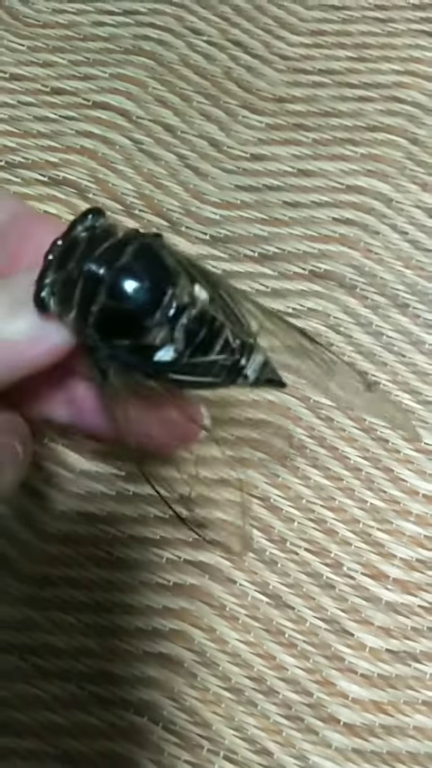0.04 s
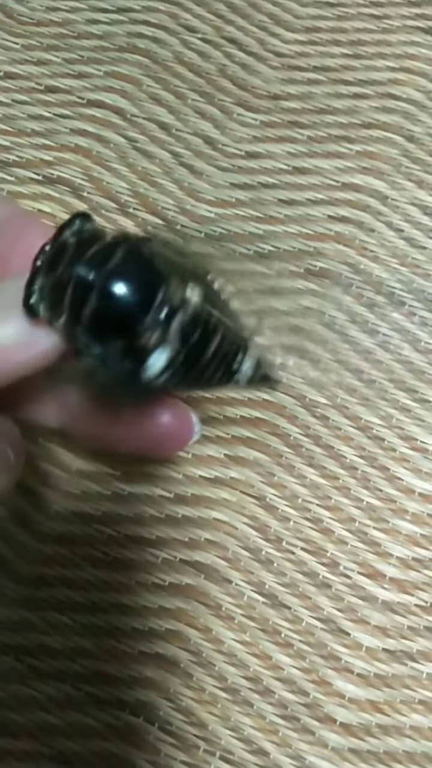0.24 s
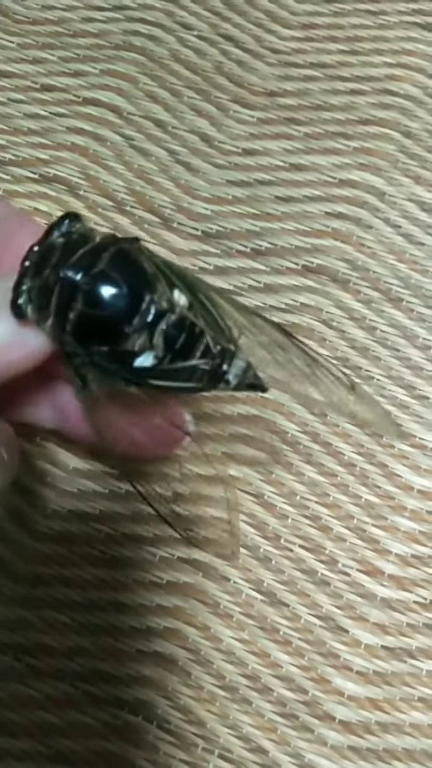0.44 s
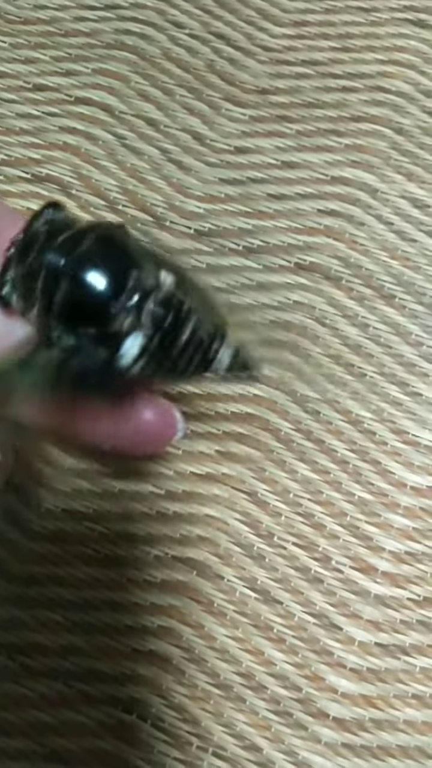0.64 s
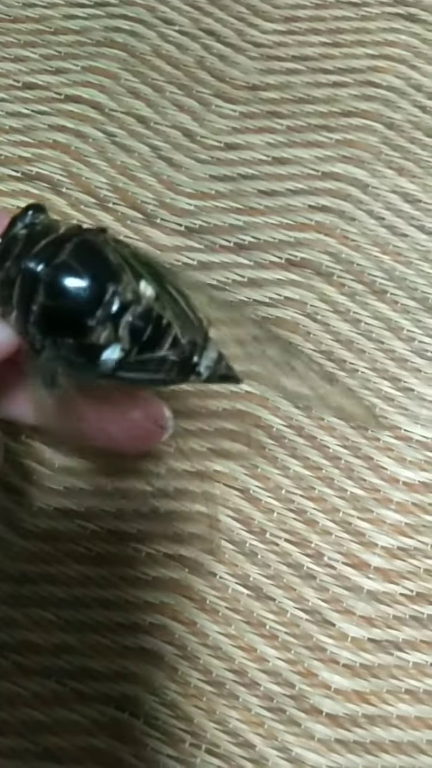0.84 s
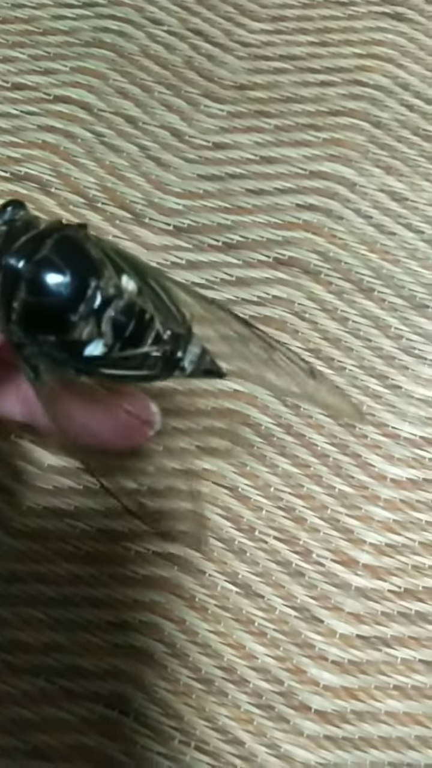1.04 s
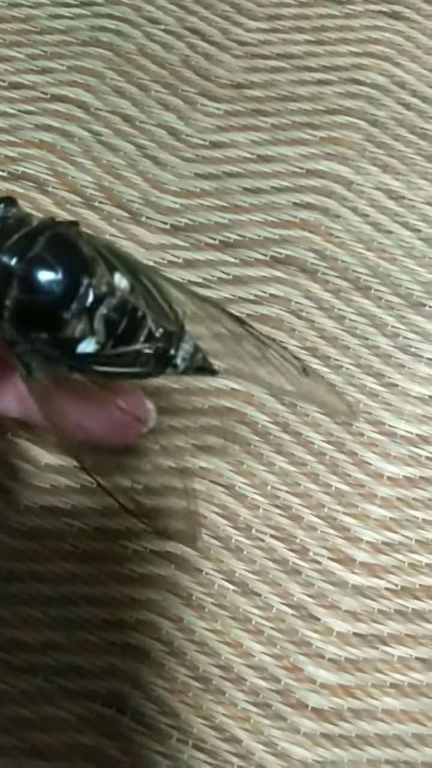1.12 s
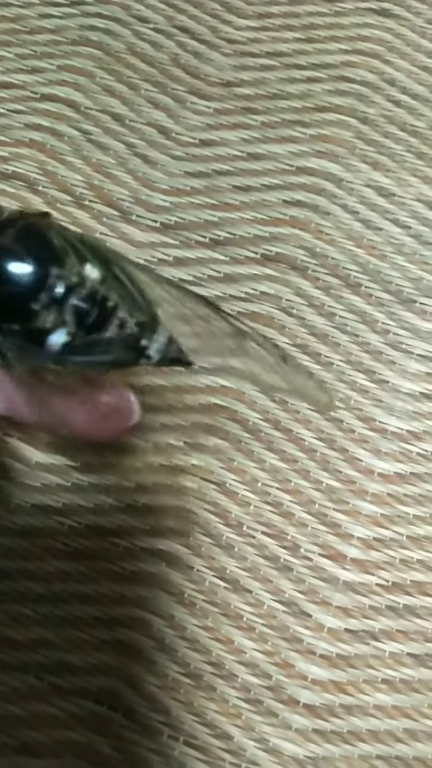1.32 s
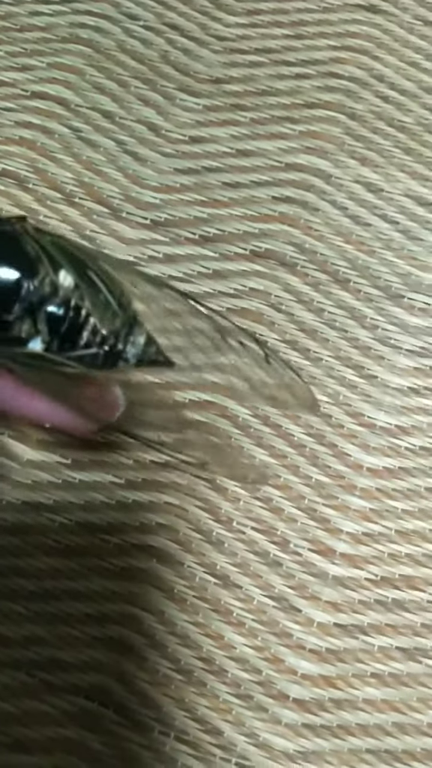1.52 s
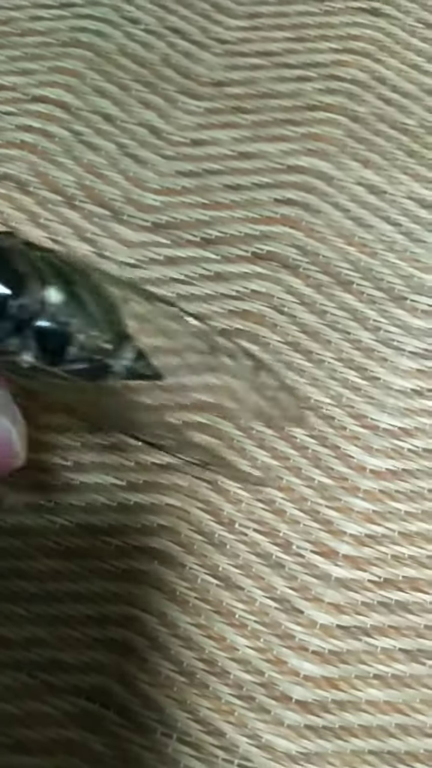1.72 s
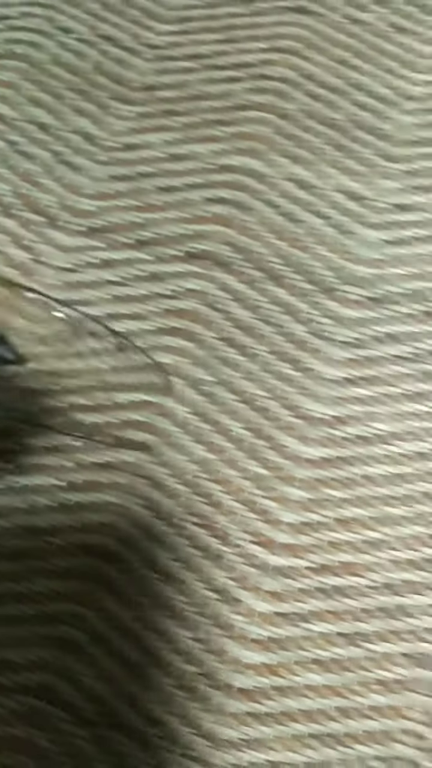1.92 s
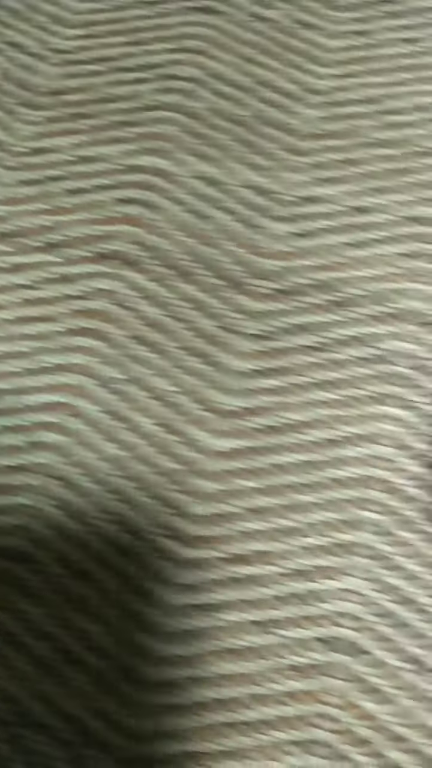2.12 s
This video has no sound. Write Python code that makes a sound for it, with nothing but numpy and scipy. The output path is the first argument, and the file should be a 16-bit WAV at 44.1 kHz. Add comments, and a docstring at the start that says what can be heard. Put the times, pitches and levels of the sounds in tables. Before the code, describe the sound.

Close up, a held cicada's stiff wings buzz and crackle in two quick bursts, then two shorter flicks, with a light flutter of air. Afterwards come only soft finger bumps and tiny ticks over faint room hiss.

```python
"""Cicada in the hand

A cicada held in the fingers beats its wings in four short bursts, close up in a quiet room.
Each beat pushes air, flicks as the wings turn, and ends in a dry snap that rings the stiff membrane.
The wings rustle as they open and fold; fingers bump softly, over rumble, hiss and a thin high band."""
import sys
import numpy as np
from scipy import signal
from scipy.fft import rfft, irfft
from scipy.io import wavfile

SR = 44100
rng = np.random.default_rng(int(sys.argv[2]) if len(sys.argv) > 2 else 0)


def inscribe(sig):
    """Save sig as 16-bit PCM at rate SR to the path in sys.argv[1].

    A 1-D sig is mono; a 2-D sig holds one channel per row.
    Samples are clipped to [-1, 1] before scaling.
    """
    pcm = np.round(np.clip(np.atleast_2d(sig).T, -1, 1) * 32767)
    wavfile.write(sys.argv[1], SR, pcm.astype(np.int16))


N = 94815

# wing beats and their accents (snap time [s], snap trim [dB], kick trim [dB], air push trim [dB])
WING_BEATS = [(-.018, -8, -11.5, 9), (.1374, -1, -13, -7), (0.1667, 1, 0.5, -0.5),
              (0.1954, 0.5, -3.5, -1.5), (0.224, 1, 0.5, 0.5), (0.2527, 1.5, 1.5, -3),
              (0.2797, 1.5, -1.5, -4), (0.3092, 0.5, -0.5, 0), (0.3379, 1.5, -1, -1),
              (0.3709, -3.5, -8.5, -3), (0.5143, -0.5, -4.5, -6), (0.5444, 0, -1.5, 0),
              (0.5734, 1, 0, -1.5), (0.6022, -0.5, -3.5, -7.5), (0.6304, 2, -2.5, 1), (0.6595, 1.5, -1, -3),
              (0.6891, -0.5, -1.5, -2.5), (0.878, -5, -3.5, -6.5), (0.9082, 1, -11, -2),
              (0.9392, -3, -3, -1), (1.1958, -1, -5.5, -5.5), (1.2279, -1.5, -8, 2)]
CLICK_RISE_S = .00024  # attack shared by the snaps' spray and the flicks


def wing_snaps(t):
    """A kick at the stroke's end and a spray of clicks ring the membrane; returns ring and spray."""
    # modes of wing and body (frequency [Hz], level [dB], t60 [s])
    modes = [(1128, 0, 0.0054), (1590, -1.5, 0.0035), (3021, 1.5, .0055), (3374, 1.5, 0.007),
             (4494, -8.5, 0.0076), (5780, -6.5, 0.0037), (6380, -3, 0.0056), (8320, -4.5, 0.0064),
             (8676, 3.5, .008), (10055, 0.5, .007), (10760, 1.5, 0.009), (11630, 5, 0.0061),
             (12900, 2, 0.0083), (15000, -3.5, 0.0066)]
    # tone of the membrane's crackle (frequency [Hz], relative density [dB])
    crackle_tone = [(300, -13), (1100, -6), (2800, -8), (4200, -1.5), (6000, 1.5), (9000, -5.5),
                    (13000, -5.5), (15500, -0.5)]
    mode_rise_s, detune, kick_s = .00034, .0062, .00007
    age = np.arange(SR // 25) / SR
    from_snap = age - .002  # leaves space for the attack
    hz, db, t60 = np.transpose(modes)[:, :, None]
    envelopes = amp(db) * np.exp(-np.log(1000) * age / t60) * (1 - np.exp(-age / mode_rise_s))
    out = np.zeros((2, len(t)))
    for when, snap_db, kick_db, _ in WING_BEATS:
        tuning = hz * (1 + detune * rng.standard_normal(hz.shape))  # no two beats ring alike
        membrane = (envelopes * np.sin(2 * np.pi * tuning * age)).sum(0)
        kick = amp(kick_db - 12) * from_snap / kick_s * bell(from_snap, kick_s)
        clicks = grains(age) * burst(from_snap, CLICK_RISE_S, fall_s=.0024)
        spray = amp(snap_db - 21) * colour(clicks, crackle_tone)
        ring = excite(membrane, kick + spray)
        start = np.searchsorted(t, when + from_snap[0])
        out[:, start:start + len(age)] += [ring, spray]
    return out


def wing_swish(t):
    """The wings flick as they turn just before each snap, then swish on the back stroke."""
    # tone of rushing air and rubbing wings (frequency [Hz], relative density [dB])
    swish_tone = [(120, 7), (350, 2.5), (700, -7.5), (1200, 5.5), (2100, -8), (3300, 5.5), (4800, -5),
                  (8600, 4), (9500, 1.5), (12000, 2.5), (15500, -6)]
    flick_lead_s, back_lag_s = .00577, .015
    power = np.zeros(len(t))
    for when, snap_db, _, push_db in WING_BEATS:
        flick = amp(snap_db - 41) * burst(t - when + flick_lead_s, CLICK_RISE_S, fall_s=.011)
        back_stroke = amp(push_db - 46) * bell(t - when - back_lag_s, width=.0019)
        power += flick ** 2 + back_stroke ** 2
    return colour(grains(t) * np.sqrt(power), swish_tone)


def air_flutter(t):
    """Each stroke displaces a hump of air; its acceleration is the low flutter, with a flap at the turn."""
    push_lead_s, push_width_s, skew = .0076, .0032, .22
    turn_lead_s, flap_width_s = .006, .0017
    out = np.zeros(len(t))
    for when, _, _, push_db in WING_BEATS:
        stroke = (t - when + push_lead_s) / push_width_s
        out += amp(push_db - 38) * (1 + skew * stroke) * (1 - stroke ** 2) * bell(stroke, 1)
        from_turn = t - when + turn_lead_s
        flap_hz = rng.uniform(295.8, 306)
        out -= amp(push_db - 48) * np.sin(2 * np.pi * flap_hz * from_turn) * bell(from_turn, flap_width_s)
    return signal.sosfilt(signal.butter(1, 22, "high", fs=SR, output="sos"), out)


def wing_rustle(t):
    """The wings rub as they open and fold; now and then a wing or claw ticks abruptly."""
    # rubs of the wings (start [s], length [s], level [dB])
    rustles = [(.117, 0.009, -56), (0.373, 0.012, -43.5), (0.39, 0.021, -63), (0.495, 0.0054, -51),
               (0.694, 0.016, -45), (.857, 0.0097, -59), (0.949, 0.011, -42.5), (1.177, 0.0039, -53),
               (1.213, 0.0019, -40), (1.244, 0.0075, -43)]
    # stray ticks (time [s], level [dB])
    ticks = [(1.342, -56), (1.585, -57.5), (1.6417, -37.5), (1.646, -44), (1.91, -65)]
    # tone of rubbing wings and claws (frequency [Hz], relative density [dB])
    rub_tone = [(200, -18), (600, -13.5), (1050, 2.5), (1750, 0), (2200, -12), (3400, 4), (4800, -4),
                (6200, 4.5), (8600, 5), (9400, -1), (12500, 0), (15500, -7)]
    tick_fall_s = .0022
    rubbing = sum(amp(db) * bell(t - start - length / 2, length / 2.1) for start, length, db in rustles)
    ticking = sum(amp(db) * (t >= when) * np.exp(-abs(t - when) / tick_fall_s) for when, db in ticks)
    return colour(grains(t) * (rubbing + ticking), rub_tone)


def finger_bumps(t):
    """Fingers bump softly: a dull thud and a short hollow ring that slides upward."""
    # bumps (time [s], thud level [dB], ring level [dB])
    bumps = [(1.368, -47, -60.5), (1.444, -74, -56.5), (1.809, -60, -68.5), (1.896, -47.5, -62.5)]
    low_hz, top_hz, glide_s, ring_s = 395, 609, .0035, .0049
    out = np.zeros(len(t))
    for when, thud_db, ring_db in bumps:
        age = t - when
        hz = top_hz + (low_hz - top_hz) * np.exp(-np.maximum(age, 0) / glide_s)
        out += amp(thud_db) * bell(age, width=.00078)
        out += amp(ring_db) * bell(age - ring_s, ring_s) * np.sin(2 * np.pi * np.cumsum(hz) / SR)
    return out


def room(send):
    """A small room answers with a diffuse tail whose lows linger longest."""
    # decay of the room (frequency [Hz], t60 [s])
    decay_times = [(200, 0.37), (1200, 0.25), (4000, 0.22), (9000, .27), (15000, 0.22)]
    # tone of the tail (frequency [Hz], relative level [dB])
    tail_tone = [(200, 8), (700, 6), (1250, 9.5), (2100, 3.5), (2900, 3.5), (3500, 3), (4700, -3),
                 (6300, -2), (7500, 1), (8500, 4), (9500, 4.5), (15000, -1.5)]
    build_up_s = .0074
    hz, age, bands = signal.stft(rng.standard_normal(SR // 2), SR, nperseg=256)
    decay = np.exp(-np.log(1000) * age / curve_at(decay_times, hz)[:, None])
    _, tail = signal.istft(bands * decay, SR, nperseg=256)
    fade_in = np.minimum(np.arange(len(tail)) / SR / build_up_s, 1)
    return excite(colour(tail * fade_in, tail_tone), send)


def background(t):
    """A steady bed of rumble and hiss, and a thin high band that swells and fades."""
    # tone of the room's rumble and hiss (frequency [Hz], relative density [dB])
    bed_tone = [(12, -7.5), (28, 2.5), (45, -16), (90, -17.5), (160, -22), (300, -27.5), (600, -35),
                (1200, -37.5), (3000, -43), (6000, -45.5), (10000, -50.5), (15000, -47)]
    # swell of the thin high band (time [s], level [dB])
    thin_swell = [(0, -88.5), (.45, -81), (.8, -81), (1.0, -77), (1.1, -73.5), (1.3, -75), (1.45, -85),
                  (1.7, -87.5), (1.9, -78), (2.15, -77.5)]
    thin_hz, half_width_hz = 6520, 230
    hz = np.fft.rfftfreq(len(t), 1 / SR)
    bed_noise, thin_noise = rfft(rng.standard_normal((2, len(t))))
    bed = unit(irfft(bed_noise * amp(curve_at(bed_tone, hz)), len(t)))
    thin = unit(irfft(thin_noise / (1 + ((hz - thin_hz) / half_width_hz) ** 2), len(t)))
    thin_db = np.interp(t, *np.transpose(thin_swell))
    return amp(-61.5) * bed + amp(thin_db) * thin


def amp(db):
    """Decibels to gain."""
    return 10 ** (np.asarray(db) / 20)


def unit(x):
    """Scales to rms 1."""
    return x / np.sqrt(np.mean(x ** 2) + 1e-20)


def curve_at(points, hz):
    """Reads a curve on a log-frequency axis."""
    knots_hz, values = np.transpose(points)
    return np.interp(np.log(hz + 1), np.log(knots_hz + 1), values)


def excite(response, x):
    """Plays x through an impulse response scaled to unit energy."""
    return signal.fftconvolve(x, response / np.linalg.norm(response))[:len(x)]


def colour(x, tone):
    """Minimum-phase EQ: shapes the tone and keeps attacks crisp."""
    log_gain = np.log(amp(curve_at(tone, abs(np.fft.fftfreq(4096, 1 / SR)))))
    spectrum = np.exp(np.conj(signal.hilbert(log_gain)))
    return excite(np.fft.ifft(spectrum).real, x)


def grains(t, roughness=.49):
    """Dense tiny clicks of uneven size."""
    noise, size = rng.standard_normal((2, len(t)))
    return unit(noise * np.exp(roughness * np.clip(size, -2, 2)))


def burst(t, rise_s, fall_s):
    """Envelope that swells to its peak at time zero, then dies away."""
    return np.exp(np.where(t < 0, t / rise_s, -t / fall_s).clip(-60, 0))


def bell(t, width):
    """Smooth hump around time zero."""
    return np.exp(-.5 * np.minimum((t / width) ** 2, 100))


def scene():
    """The insect up front, the hand that holds it and the room behind, in mono."""
    pre_roll_s = .1  # the room is already ringing at the start
    direct_spray_db, flutter_send_db, room_db = -8.5, -12, -15
    t = np.arange(-round(pre_roll_s * SR), N) / SR
    ring, spray = wing_snaps(t)
    rubbing = wing_swish(t) + wing_rustle(t)
    flutter = air_flutter(t)
    wings = ring + amp(direct_spray_db) * spray + rubbing + flutter
    reverb = amp(room_db) * room(spray + rubbing + amp(flutter_send_db) * flutter)
    return (wings + finger_bumps(t) + reverb + background(t))[None, -N:]


def record(dry):
    """A steep low-pass trims the very top."""
    cutoff_hz = 15600
    taps = signal.firwin(121, cutoff_hz, window=("kaiser", 8), fs=SR)
    return signal.oaconvolve(dry, taps[None], "same")


dry = scene()
out = record(dry)
inscribe(out)
```